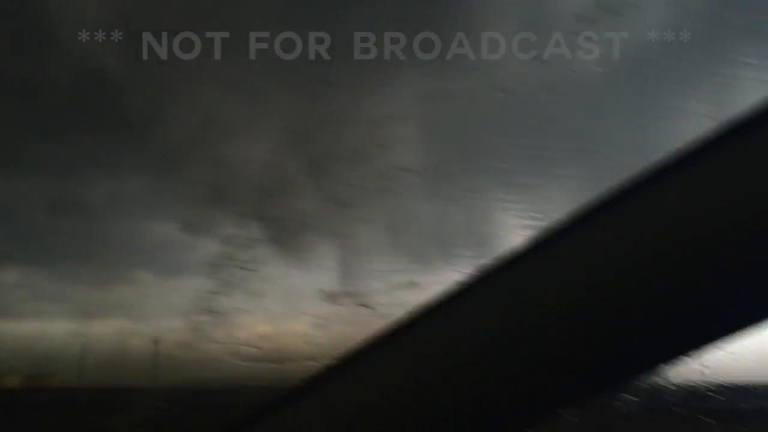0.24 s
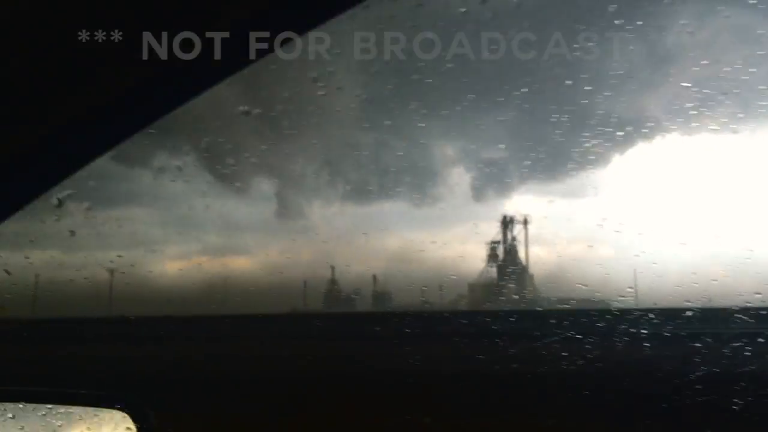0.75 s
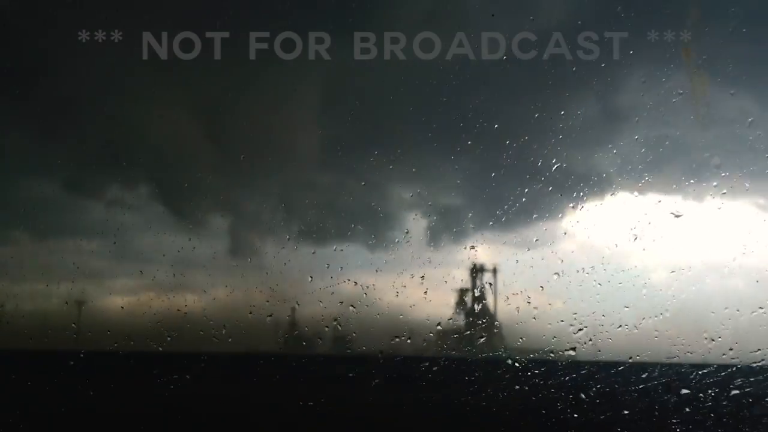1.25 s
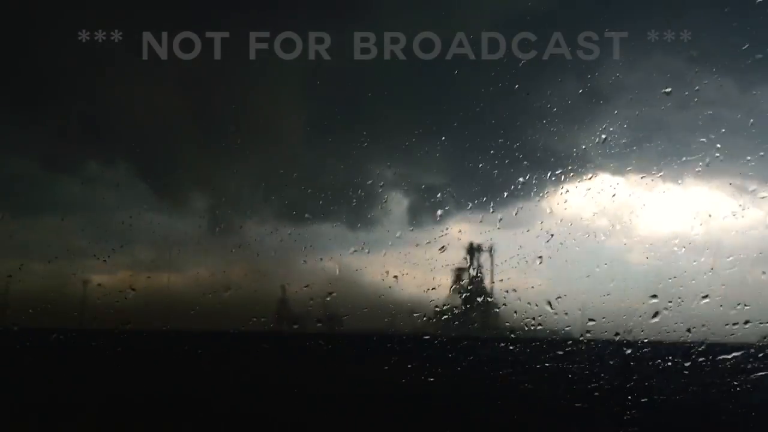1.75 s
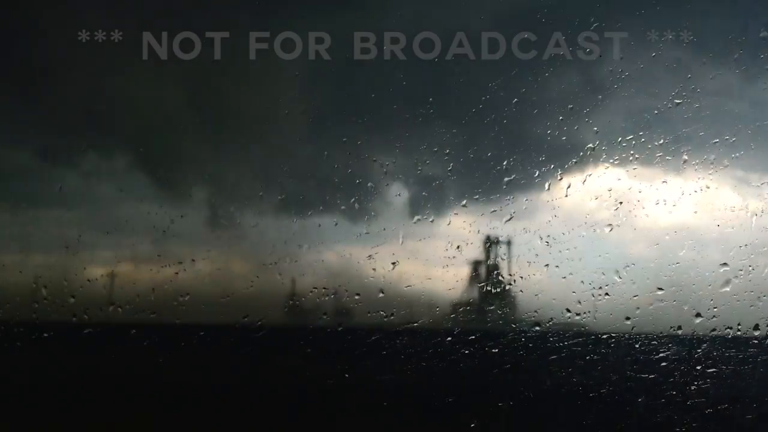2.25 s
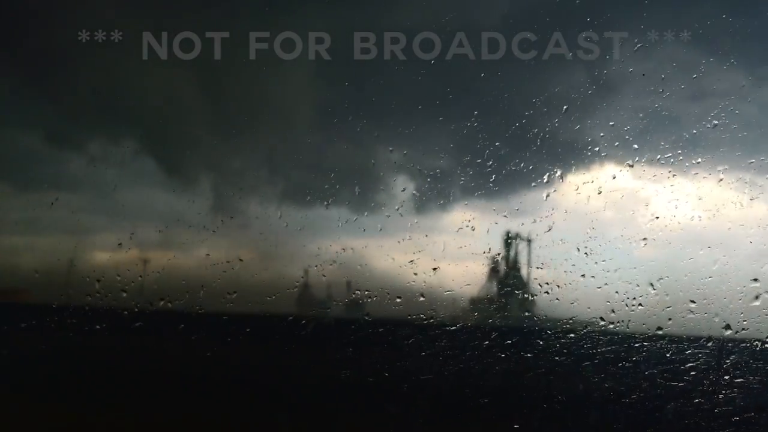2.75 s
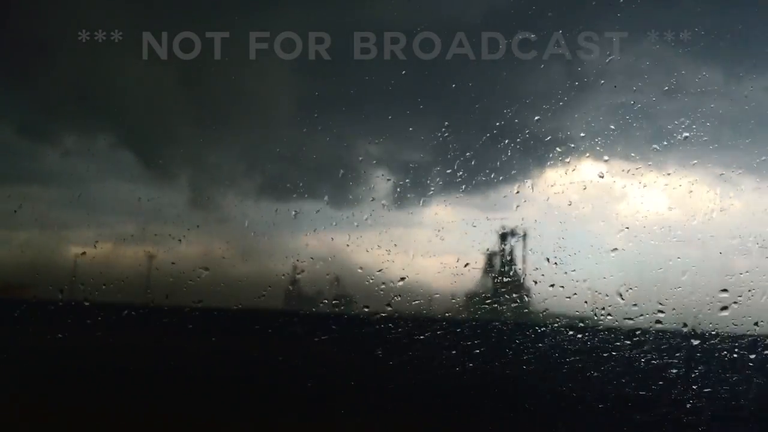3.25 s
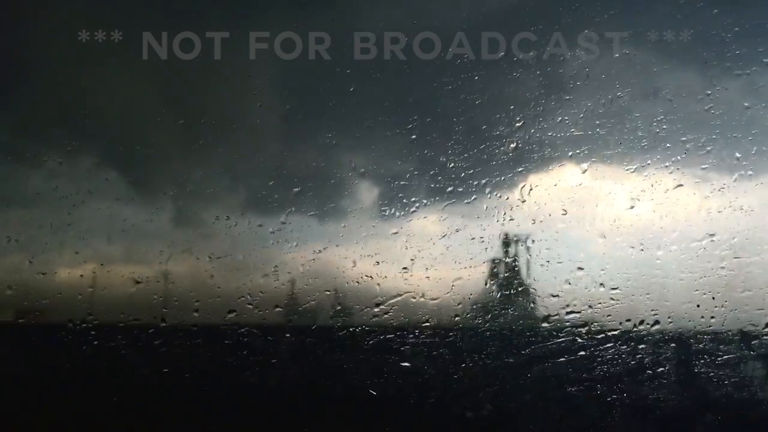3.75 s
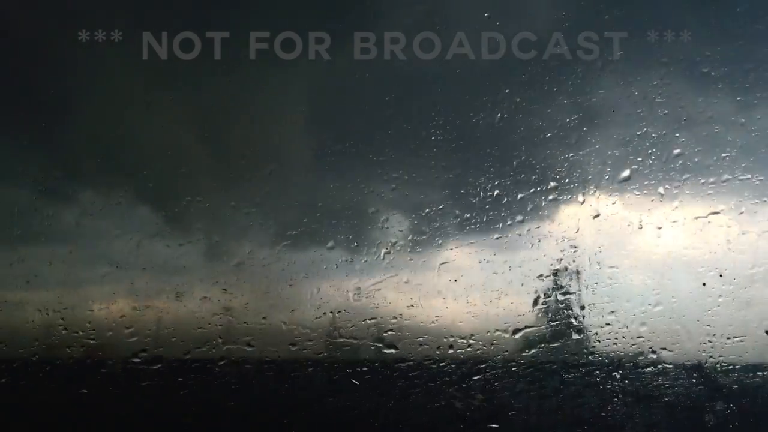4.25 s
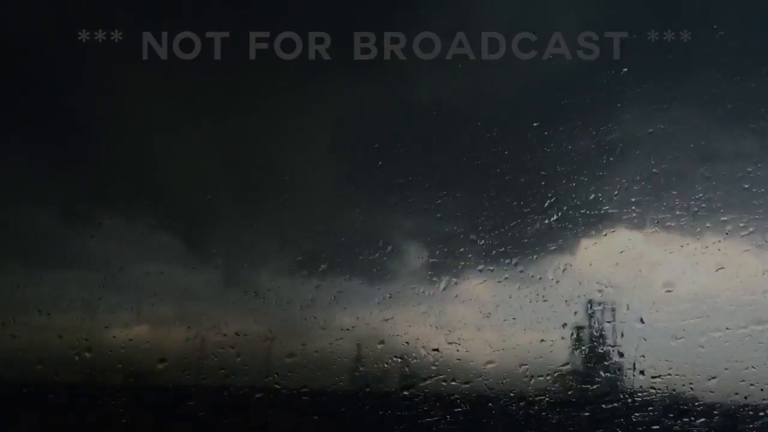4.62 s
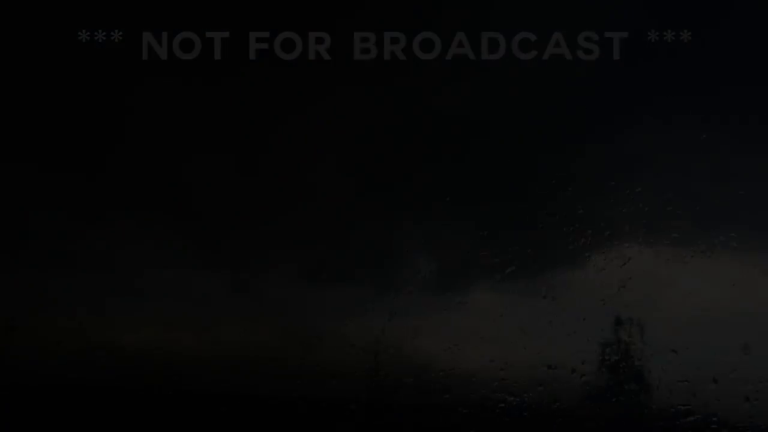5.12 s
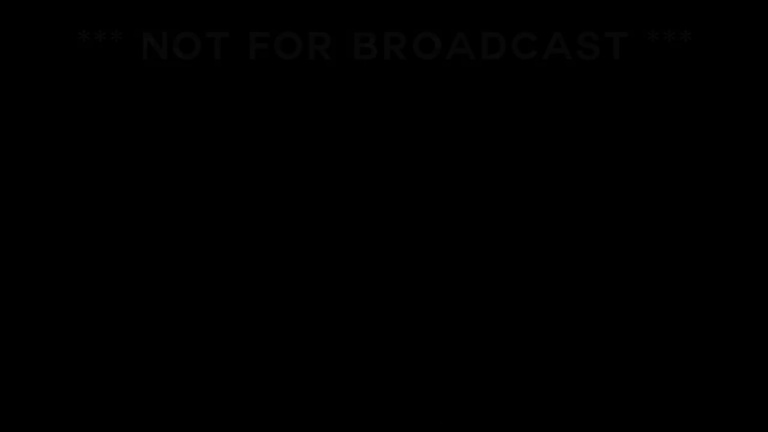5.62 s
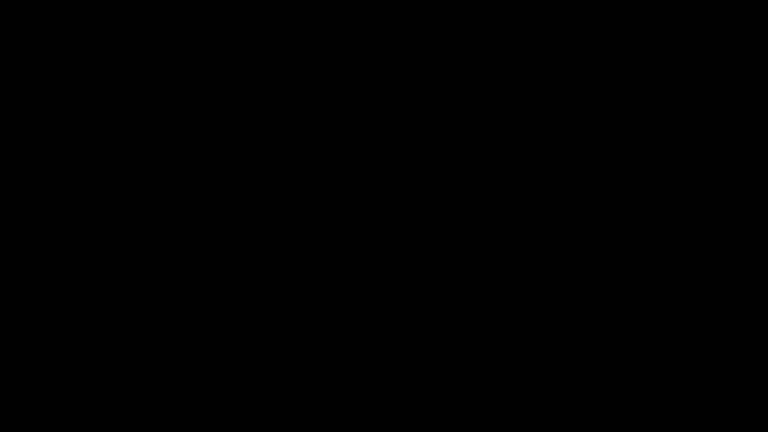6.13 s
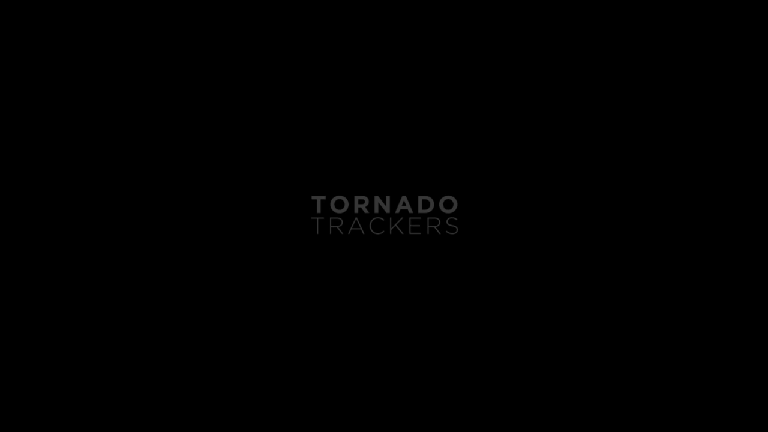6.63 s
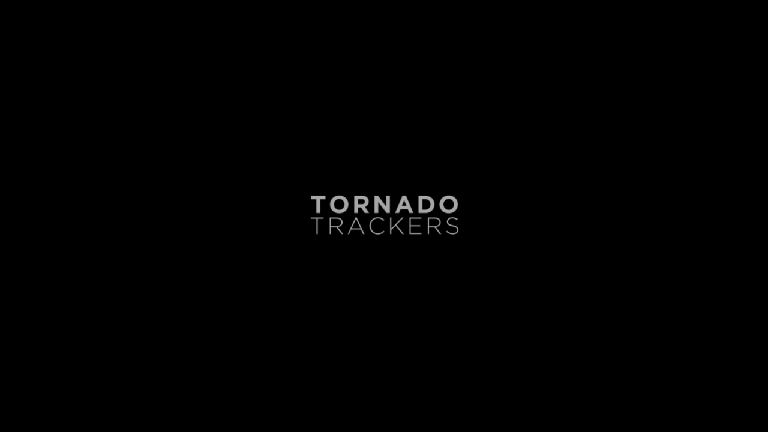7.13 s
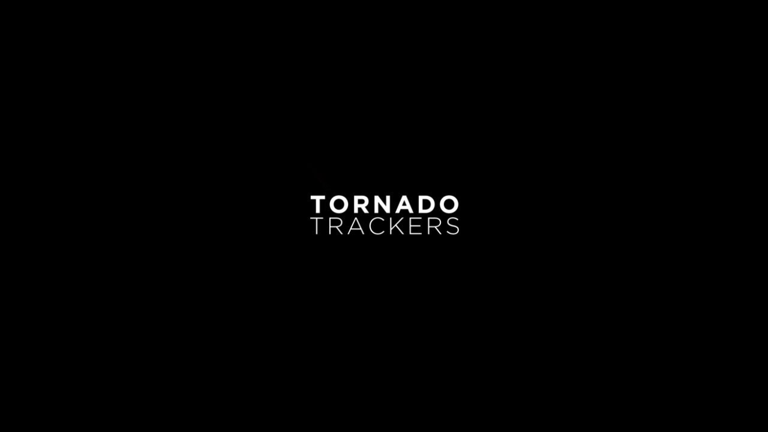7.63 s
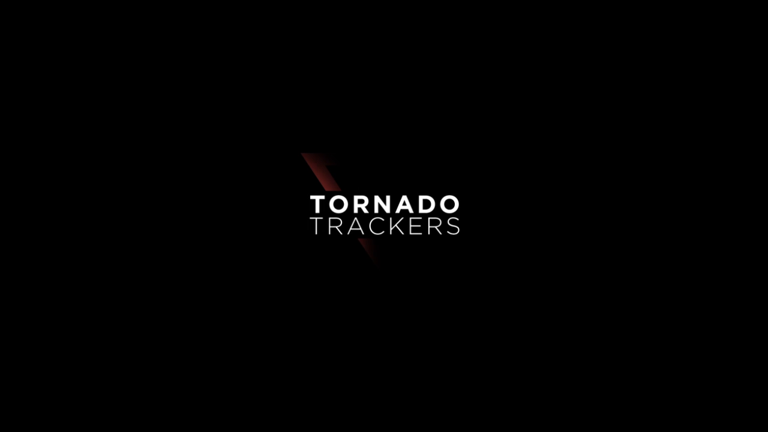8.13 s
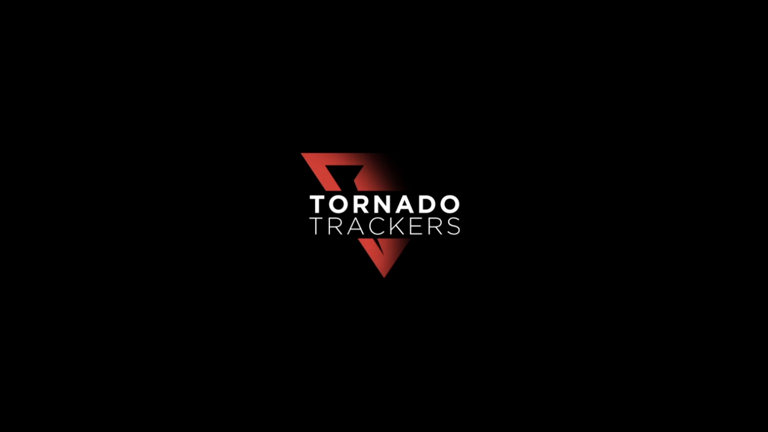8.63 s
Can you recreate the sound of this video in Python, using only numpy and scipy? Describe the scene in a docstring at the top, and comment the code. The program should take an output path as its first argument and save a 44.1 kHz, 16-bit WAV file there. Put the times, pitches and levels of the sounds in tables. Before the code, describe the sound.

Rain in a small, dry car cabin, microphone close to the windows. Crisp ticks and duller thuds of large drops land unevenly over a continuous light patter that swells and ebbs with the wind. Low booming air and panel vibration carry a faint fluttering hiss. The impacts grow denser and stronger mid-way, peak with one loud smack, then thin out while the whole sound recedes without reaching silence.

```python
"""Wind-driven rain on the roof and glass of a car, heard in the cabin.
From the start single heavy drops strike over gusts that throw sheets of small drops; each drop is a
noise splash in third-octave bands that the cabin holds for a few hundredths of a second.
Under it wind and road shake panels and cabin air: resonant noise plus a fluttering hiss.
All of it fades from 4.33 s on; the heaviest drop strikes at 5.5 s, early in the fade."""
import sys
import numpy as np
from scipy import signal
from scipy.fft import rfft, irfft
from scipy.io import wavfile
from scipy.ndimage import uniform_filter1d

SR = 44100
rng = np.random.default_rng(int(sys.argv[2]) if len(sys.argv) > 2 else 0)


def dump(signal):
    """Clip the signal to [-1, 1] and save it as 16-bit WAV at the path in sys.argv[1]."""
    limited = np.clip(np.atleast_2d(signal).T, -1, 1)
    pcm = np.round(limited * 32767).astype(np.int16)
    wavfile.write(sys.argv[1], SR, pcm)


N = 391605
TIME_S = np.arange(N) / SR
FREQ_HZ = np.maximum(np.arange(N // 2 + 1) * SR / N, 1.)

# heavy drops: t/s, peak level/dB, thud (low end)/dB and tick (top end)/dB against an average drop
HEAVY_DROPS = [(0.161, -17, -23, -7), (0.2538, -28, 7, -1), (0.2723, -20, 7, -6), (0.53, -16, -2, -7),
               (0.5488, -22.5, -9, 16), (0.6625, -25, -19, 12), (0.7, -14.5, 3, -8), (0.739, -15.5, -10, 0),
               (0.905, -14.5, -12, -3), (0.986, -14, -9, -1.5), (1.0584, -13, -6, -16),
               (1.0786, -9, -5, -1), (1.1, -13, -1, -5), (1.1394, -25, 12, -5), (1.1797, -20.5, 11, 5),
               (1.292, -21, -3, -11), (1.3176, -9, -9, 1), (1.3676, -16, -7, -18), (1.4408, -21.5, 5, -3),
               (1.597, -32.5, -3, 9.5), (1.6933, -22, -6, 4.5), (1.774, -16.5, -1, -5),
               (1.841, -26.5, 9, -2), (1.863, -21, 3, -4), (1.9438, -14, 5, -15), (2.0063, -35.5, 1, 26),
               (2.1254, -18.5, 6, -14.5), (2.175, -26, 0, -4), (2.203, -19, -15, -6),
               (2.4345, -23.5, 6, -11), (2.547, -21, -2, 10), (2.6623, -18, 5, 3), (2.72, -15.5, 3, -7),
               (2.8053, -14.5, -5, -5), (2.8655, -10, -4.5, -6.5), (2.924, -19.5, -4, -6),
               (3.005, -17.5, 11, -26), (3.099, -10.5, -10, -16), (3.1606, -18, 0, -4),
               (3.182, -12.5, 1.5, 0), (3.228, -8, -4, -9), (3.243, -4, -4, -0.5), (3.294, -20.5, 11, -13),
               (3.3406, -14, -1, -4), (3.3767, -5, -14, -19), (3.4478, -14, -7, 1), (3.463, -9, -9, -5),
               (3.4245, -23, 2, 0), (3.659, -10, -10, -5.5), (3.7725, -27, 20, -15), (3.807, -27, 10, 1),
               (3.8666, -23, -13, 8), (3.889, -16, 9, 0), (3.9606, -12.5, 1, -9), (4.025, -15, -1, 5),
               (4.081, -21.5, 9, -12), (4.117, -21, 2, 3), (4.3086, -30, 9, 5), (4.4038, -15, -18, 7),
               (4.435, -18, -3, 10), (4.5203, -27.5, 3, 7), (4.556, -5, -2.5, -6), (4.6486, -22.5, 4, 6),
               (4.7457, -17, 8, -15), (4.778, -27.5, -7, 20.5), (4.7944, -21, -10, 8),
               (4.8444, -23.5, 9, 1), (4.858, -9.5, 1.5, -7.5), (4.885, -15.5, 0, 0), (4.9274, -15, 4, -5),
               (4.99, -15, -3, 3), (5.039, -13, 3, -5), (5.0632, -10.5, -11, -6), (5.108, -14.5, 4, -3),
               (5.128, -5, -7, -10), (5.2407, -16, 7.5, -11), (5.2485, -13.5, 2, -2),
               (5.369, -17, 12.5, -11), (5.4176, -7.5, -6, -4), (5.4235, -5.5, 3, -10), (5.477, -18, 0, -3),
               (5.5012, 7, -7.5, -10.5), (5.5344, -23, -8, 13), (5.559, -7.5, -5, -8), (5.579, -22, -7, -3),
               (5.598, -17, 2, 6.5), (5.625, -15, -16, 5), (5.636, -12, -1, 2), (5.6494, -20, 0, 1),
               (5.681, -15.5, 2.5, 3), (5.7628, -12.5, 6.5, -5.5), (5.83, -23, 16, 6),
               (6.08, -27.5, -2, 18), (6.1065, -27.5, 25.5, -9), (6.1934, -33, 0, 1), (6.254, -5.5, -2, 6),
               (6.3236, -14.5, 1, -2), (6.399, -20, 2, 0), (6.508, -27.5, -6, 6), (6.528, -23.5, 4, 4),
               (6.6435, -17.5, -2, -6), (6.7307, -13, -18, 0), (6.8259, -21, -8, 1),
               (6.8582, -4.5, -5, 3.5), (7.076, -31.5, -2, 7), (7.178, -21, 1, -3),
               (7.215, -14.5, -12, -16), (7.586, -25.5, 18, 2), (7.7683, -11.5, -24, 2.5),
               (7.9299, -19.5, -3, -10), (7.9868, 0, -3, 1.5), (8.043, -25.5, 25, -5),
               (8.0514, -25, 16, -2), (8.3444, -8.5, -9.5, 7), (8.5286, -24, -12, 11)]
# gusts throwing sheets of small drops: t of the height/s, peak level of a small drop/dB,
# swell/s, ebb/s, tick/dB against an average drop
GUSTS = [(0.04, -41.5, 0.026, 0.013, 3.5), (0.3, -45.5, 0.033, .06, 1), (0.42, -43, 0.057, 0.068, 2.5),
         (0.54, -45.5, 0.064, 0.074, 4), (0.73, -41, 0.041, 0.024, 2), (0.95, -47, 0.021, 0.11, 1.5),
         (1.13, -38.5, 0.059, 0.057, 0.5), (1.25, -43, 0.035, 0.043, -6), (1.33, -38, 0.037, 0.041, 1),
         (1.76, -45, 0.068, 0.021, 4), (1.97, -54, 0.12, 0.084, 7), (2.83, -48.5, 0.052, .07, -1),
         (3.25, -45.5, 0.12, 0.28, 3.5), (3.89, -45, .14, 0.13, 0), (4.15, -43, 0.15, 0.12, -2.5),
         (4.43, -55, 0.025, 0.099, 7), (4.58, -58, .03, 0.015, 2), (4.79, -44, .025, .03, -2),
         (4.89, -53, .02, 0.047, -4), (5.14, -42, 0.017, .025, 0.5), (5.44, -49.5, 0.17, 0.018, 4),
         (5.62, -48, 0.088, .05, 2), (5.77, -44.5, 0.053, 0.12, 4.5), (5.99, -43.5, 0.043, 0.0099, 7.5),
         (6.27, -47, 0.071, 0.046, 5), (6.66, -46, .06, 0.12, 1), (7.3, -43.5, 0.11, 0.085, 1),
         (7.66, -50, 0.056, 0.19, -3), (8.55, -45, 0.057, 0.24, 3)]
# small drops between gusts: t/s, peak level of a small drop/dB
LULL = [(0.0, -48.5), (0.2, -52), (0.85, -55.5), (1.5, -55.5), (2.2, -52.5), (2.6, -57.5), (3.0, -51.5),
        (3.6, -50), (4.4, -53.5), (5.0, -49.5), (5.23, -52.5), (6.1, -49.5), (7.0, -51), (7.55, -56.5),
        (8.0, -51.5), (8.45, -51), (8.76, -68), (8.88, -67)]
# colour of a splash through glass and trim: f/Hz, density/dB per Hz
GLASS = [(290, -33), (500, -9.5), (553, -2), (761, -6.5), (843, -5), (1110, -2.5), (2770, 1.5),
         (4470, -3.5), (5090, -8.5), (5550, -8), (9630, -15), (10500, -17.5), (14700, -18.5), (15300, -29),
         (16000, -45.5)]
# ring of the nearest window: f/Hz, width/Hz, level over the splash colour/dB
PANE = [(2640, 43, 0.5), (4800, 30, -9), (5360, 180, 2.5)]
# decay of the cabin: f/Hz, t60/s
CABIN_T60 = [(600, 0.14), (1500, 0.1), (3500, 0.078), (9000, 0.072)]
# rumble: t/s, cabin boom level/dB, panel level/dB, road hiss level/dB
RUMBLE = [(0.0, -23, -25.5, -35), (0.9, -22, -22, -33.5), (1.2, -18.5, -24.5, -32),
          (1.66, -23, -26.5, -34.5), (2.15, -25.5, -21.5, -33), (2.35, -19, -28, -33.5),
          (2.8, -23, -24.5, -32.5), (3.36, -18, -23.5, -30.5), (3.65, -18, -27, -34),
          (4.1, -23.5, -26, -33), (4.6, -25, -25, -32), (5.12, -26, -22.5, -32.5), (5.6, -22, -25, -32),
          (6.3, -21.5, -24, -34.5), (6.7, -19, -24, -36), (7.0, -20, -22.5, -33), (8.1, -23.5, -25, -34.5),
          (8.88, -20.5, -24.5, -32)]
# resonances of the cabin air: f/Hz, width at -6 dB/Hz, relative level/dB
BOOM = [(46.1, 17.7, 0.5), (78.4, 40, 1.5), (94.2, 17.5, 1)]
# resonances of the body panels: f/Hz, width at -6 dB/Hz, relative level/dB
PANELS = [(125.5, 21.7, -4), (152.8, 26, -2.5)]
# colour of the road hiss: f/Hz, relative density/dB per Hz
ROAD = [(110, -21), (185, -2.5), (225, -6.5), (272, -5), (310, -11), (370, -17), (450, -20), (560, -20),
        (756, -27), (842, -24), (1200, -33.5), (1600, -34), (2600, -120)]
# share of the thud and of the tick that reaches a band: f/Hz, factor
THUD_SHARE = [(1100, 0.96), (2000, 0.23)]
TICK_SHARE = [(4000, 0.29), (6800, 0.87), (14000, 1.0)]

ECHO_S, ECHO_DB = 0.004, -7  # first return from the facing window
LULL_TICK_DB, TICK_WANDER_DB = 0.4, 2.5  # tick of lull drops against an average drop; rms wander, all small drops
FADE_FROM_S, FADE_ZERO_S = 4.33, 9.5  # the zero lies past the end
TOP_HZ = 15500


def splashes(drops, patchy_db, crack_t60_s, linger_db, rise_s, rise_cycles, tilt_db_per_oct):
    """Each drop cracks, echoes once and lingers in the cabin: noise with its own level per band."""
    bands_hz = 500 * 2 ** (np.arange(16) / 3)
    _, peak_db, thud_db, tick_db = drops.T
    index = (drops[:, 0] * SR).astype(int)
    # neighbouring bands share part of their colour
    colour_db = rng.standard_normal((len(drops), len(bands_hz)))
    colour_db = patchy_db * uniform_filter1d(colour_db, size=3, axis=1)

    spectrum = 0
    for k, hz in enumerate(bands_hz):
        level_db = peak_db + colour_db[:, k]
        level_db = level_db + on_log(hz, THUD_SHARE) * thud_db + on_log(hz, TICK_SHARE) * tick_db

        crack = fall(np.bincount(index, db_to_power(level_db), N), crack_t60_s)
        echo = db_to_power(ECHO_DB) * np.roll(crack, int(ECHO_S * SR))
        linger_hits = np.bincount(index, db_to_power(level_db + linger_db), N)
        power = crack + echo + fall(linger_hits, on_log(hz, CABIN_T60))

        # low bands take more time to build up
        rise = np.hanning(max(int((rise_s + rise_cycles / hz) * SR), 3))
        power = signal.oaconvolve(power, rise / rise.sum())[:N]
        noise = np.sqrt(np.abs(power)) * rng.standard_normal(N)
        band_gain = np.cos(np.pi / 2 * np.clip(3 * np.log2(FREQ_HZ / hz), -1, 1))
        spectrum = spectrum + rfft(noise) * band_gain
    return irfft(spectrum * glass_response(tilt_db_per_oct), N)


def glass_response(tilt_db_per_oct):
    """Splash colour with the pane resonances; harder blows are given a brighter tilt."""
    colour = db_to_gain(on_log(FREQ_HZ, GLASS) + tilt_db_per_oct * np.log2(FREQ_HZ / 3000))
    ring = sum((db_to_gain(db) - 1) / (1 + 2j * (FREQ_HZ - hz) / width_hz) for hz, width_hz, db in PANE)
    return colour * (1 + ring)


def small_drops(count=8000, spread_db=4.0):
    """Drops at random moments, many small and few large, following the sheets; rows as HEAVY_DROPS."""
    chance = rng.random((count, 2))
    at_s = chance[:, 0] * TIME_S[-1]
    size_db = np.minimum(-spread_db * np.log(chance[:, 1]), 15.)
    peak_db, tick_db = sheet_levels(at_s)
    tick_db = tick_db + TICK_WANDER_DB * np.interp(at_s, TIME_S, walk(8.))
    return np.transpose([at_s, peak_db + size_db, np.zeros(count), tick_db])


def sheet_levels(at_s):
    """Peak and tick of small drops/dB: each gust swells and ebbs as a bell added to the lull's power."""
    height_s, peak_db, swell_s, ebb_s, tick_db = np.transpose(GUSTS)[:, :, None]
    side_s = np.maximum(np.where(at_s < height_s, swell_s, ebb_s), 1e-3)
    gusts = db_to_power(peak_db) * np.exp(-((at_s - height_s) / side_s) ** 2)
    lull = db_to_power(np.interp(at_s, *np.transpose(LULL)))
    power = lull + gusts.sum(axis=0)
    mean_tick_db = (lull * LULL_TICK_DB + (gusts * tick_db).sum(axis=0)) / power
    return 10 * np.log10(power), mean_tick_db


def rumble():
    """Cabin air and panels ring under wind and road; a fluttering hiss lies above them."""
    boom_db, panel_db, road_db = curves(RUMBLE)
    boom = db_to_gain(boom_db) * ringing(BOOM)
    panels = db_to_gain(panel_db) * ringing(PANELS)
    hiss = unit(shaped(rng.standard_normal(N), db_to_gain(on_log(FREQ_HZ, ROAD))))
    flutter_db = 0.75 * walk(16.)
    return boom + panels + db_to_gain(road_db + flutter_db) * hiss


def ringing(modes):
    """Noise through steep resonances; rms 1."""
    power = 0
    for hz, width_hz, db in modes:
        detune = (FREQ_HZ - hz) / (width_hz / 2)
        power = power + db_to_power(db) / (1 + detune ** 2) ** 2
    return unit(shaped(rng.standard_normal(N), np.sqrt(power)))


def fall(power, t60_s):
    """Each impulse of power decays exponentially by 60 dB in t60_s."""
    return signal.lfilter([1], [1, -np.exp(-2 * np.log(1000) / (t60_s * SR))], power)


def walk(rate_hz):
    """Random levels held 1 / rate_hz and smoothed by two moving averages; rms 1."""
    hold = int(SR / rate_hz)
    steps = np.repeat(rng.standard_normal(N // hold + 1), hold)
    return unit(uniform_filter1d(uniform_filter1d(steps, hold), hold)[:N])


def shaped(x, gain):
    """x filtered by a gain given on FREQ_HZ."""
    return irfft(rfft(x) * gain, N)


def curves(table):
    """Columns of a (t/s, ..) table, interpolated at every sample."""
    t_s, *columns = np.transpose(table)
    return [np.interp(TIME_S, t_s, column) for column in columns]


def on_log(hz, table):
    """(f/Hz, value) rows interpolated on a log-frequency axis."""
    table_hz, values = np.transpose(table)
    return np.interp(np.log(hz), np.log(table_hz), values)


def unit(x):
    """x scaled to rms 1."""
    return x / np.sqrt(np.mean(x ** 2))


def db_to_gain(db):
    """dB to amplitude ratio."""
    return 10 ** (np.asarray(db) / 20)


def db_to_power(db):
    """dB to power ratio."""
    return 10 ** (np.asarray(db) / 10)


def scene():
    """Heavy drops, sheets of small ones and the rumble under one linear fade."""
    heavy = splashes(np.array(HEAVY_DROPS), patchy_db=5.0, crack_t60_s=0.0071, linger_db=-7.5,
                     rise_s=0.00074, rise_cycles=7.2, tilt_db_per_oct=1.12)
    small = splashes(small_drops(), patchy_db=7.5, crack_t60_s=0.016, linger_db=-2.5,
                     rise_s=0.0023, rise_cycles=6.4, tilt_db_per_oct=0.24)
    fade = np.clip((FADE_ZERO_S - TIME_S) / (FADE_ZERO_S - FADE_FROM_S), 0, 1)
    return (fade * (heavy + small + rumble()))[None]


def record(dry):
    """The microphone drops the deepest bass; a steep low-pass cuts the top."""
    bass_cut = signal.butter(5, 34., "highpass", fs=SR, output="sos")
    top_cut = signal.ellip(10, .2, 80, TOP_HZ, fs=SR, output="sos")
    return signal.sosfilt(top_cut, signal.sosfilt(bass_cut, dry))


dry = scene()
out = record(dry)
dump(out)
```